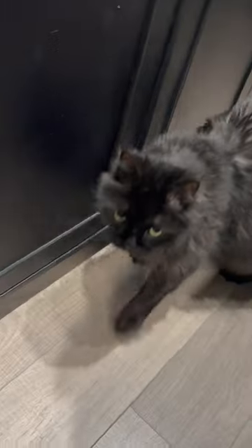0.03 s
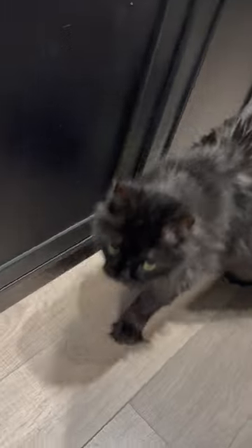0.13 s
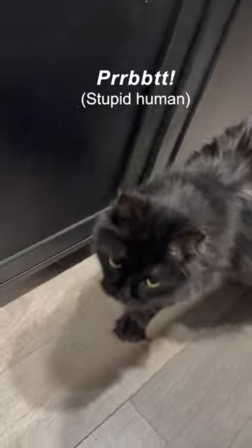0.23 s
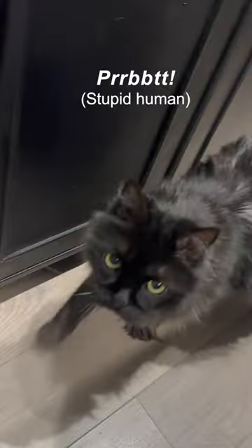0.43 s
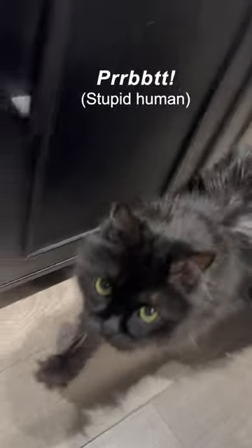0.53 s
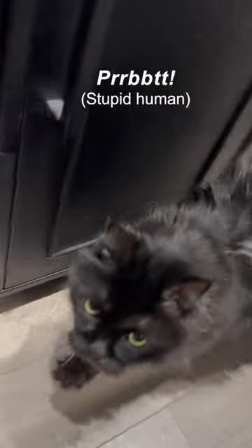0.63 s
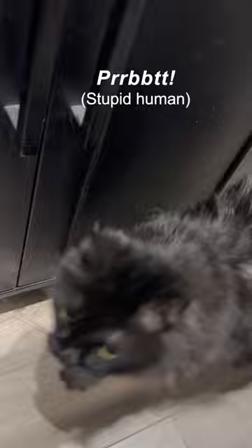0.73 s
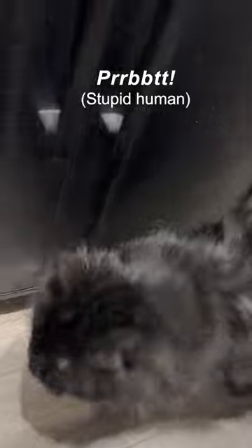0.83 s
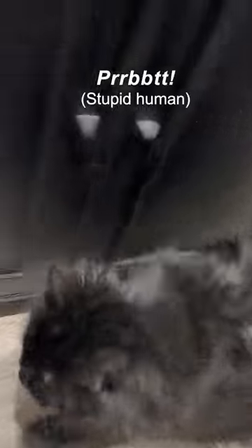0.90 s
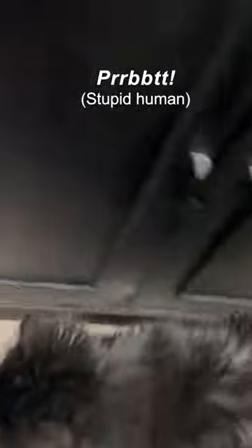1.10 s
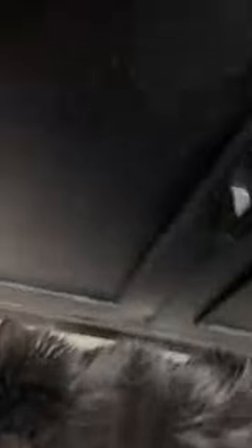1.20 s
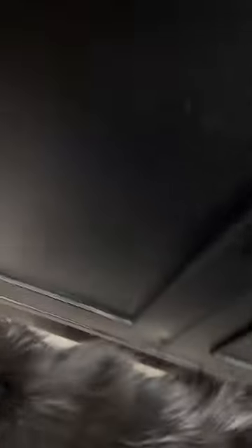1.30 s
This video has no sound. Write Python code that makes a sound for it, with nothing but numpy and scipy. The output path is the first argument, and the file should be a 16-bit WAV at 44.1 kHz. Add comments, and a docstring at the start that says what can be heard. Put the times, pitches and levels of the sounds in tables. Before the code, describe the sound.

One brief, rolling cat trill sounds close by in a quiet room with a low rumble. Soft paw steps on wooden boards come before and after it, and a sharp double click follows the trill.

```python
"""First comes the low rumble of a quiet room, with soft pats as a cat walks up over a wooden floor.
A few dull bumps come through the boards. The cat gives one low, closed-mouth trill: pulses from its
throat ring in throat and nose, flutter about forty times a second and brighten with effort.
Then something small and hard clicks twice close by, and the paws pat again."""
import sys
import numpy as np
from scipy import signal
from scipy.fft import rfft, irfft
from scipy.io import wavfile

SR = 44100
rng = np.random.default_rng(int(sys.argv[2]) if len(sys.argv) > 2 else 0)


def dump_mix(stems):
    """Bounce the given channels to the path in sys.argv[1] as a 16-bit WAV at rate SR."""
    frames = np.atleast_2d(stems).T  # one column per channel
    limited = np.clip(frames, -1, 1)  # hard clip at full scale
    pcm = np.round(limited * 32767).astype(np.int16)
    wavfile.write(sys.argv[1], SR, pcm)


N = 59535

# colour of the room's rumble and hiss (frequency [Hz], relative level [dB])
ROOM_COLOUR = [(25, -8.5), (40, -3.5), (60, -4.5), (78, -0.5), (115, -7.5), (150, -6.5), (210, -14.5),
               (320, -20), (450, -29), (700, -38), (1100, -42.5), (1600, -45), (2100, -40), (2800, -47),
               (4000, -48), (6200, -49), (9500, -55.5), (11000, -72.5)]
# how much of that sound differs between the ears (frequency [Hz], relative level [dB])
ROOM_WIDTH = [(40, -25.5), (120, -22), (300, -6.5), (800, 6), (2500, -9), (9000, 1.5)]
# echo of the walls (band [Hz], time to fade by 60 dB [s], relative level [dB])
ECHO_BANDS = [(154, .3, -7.5), (396, 0.31, 5), (930, 0.25, 3.5), (2380, 0.31, -5), (4000, 0.34, -1.5),
              (7730, 0.18, -1.5), (14900, 0.073, 4.5)]
# dull bumps through the floor (time [s], level [dB], pitch [Hz])
FLOOR_BUMPS = [(0.246, -36, 82.4), (0.291, -32, 77.5), (0.468, -37, 76), (0.814, -36.5, 66.95),
               (1.083, -45, 86.7)]
# paw steps (time [s], level [dB], decay [s], tilt [dB/octave], thud pitch [Hz], thud over scuff [dB])
PAW_STEPS = [(.053, -47.5, 0.0045, -3, 580, 0), (0.094, -62.5, 0.01, -9, 527, 10),
             (.246, -49, 0.013, -4, 650, -1), (0.705, -53.5, 0.013, 4, 388.3, 4),
             (0.777, -67.5, 0.015, 13.5, 498, 15.5), (1.289, -58, 0.0033, -12, 386, 17),
             (1.323, -61.5, 0.013, 0.5, 494, -8)]
# colour of a paw on the boards (frequency [Hz], relative level [dB])
SCUFF_COLOUR = [(100, -17), (350, -12.5), (600, 6.5), (900, -16), (1500, -9.5), (2400, -8), (5000, -24),
                (8000, -36.5), (11000, -54), (14000, -80)]
# contacts of the double click (time [s], level [dB], decay [s], tilt [dB/octave], relative ring [dB])
CONTACTS = [(1.0377, -37.5, 0.0017, 0, -11), (1.0389, -27.5, 0.002, -0.5, -23),
            (1.046, -41, 0.00099, -7, -19), (1.0606, -36.5, 0.0059, 0.5, -29),
            (1.0642, -37.5, 0.0047, -5, -12), (1.0658, -31, 0.0042, 3, -32)]
# colour of the click as heard, with a narrow gap near 12 kHz (frequency [Hz], relative level [dB])
HEARD_CLICK_COLOUR = [(200, -6), (500, -2), (1150, 0), (1700, 0), (2400, 6), (3100, 5), (4600, 2.5),
                      (5700, -1.5), (6600, -1.5), (8500, -3.5), (10300, -12), (12000, -56), (14000, -13),
                      (15500, -11)]
# ringing tones of the hard thing (pitch [Hz], relative level [dB], time to fade by 60 dB [s])
RING_TONES = [(1197, -6.5, 0.075), (1510, -26, 0.026), (2330, 14, 0.028), (2540, -16, 0.012),
              (2840, 11, 0.05), (3197, 10.5, 0.026), (6040, 17.5, 0.011), (7400, -26, 0.034)]
# tune of the trill (time [s], pitch [Hz])
TRILL_PITCH = [(.28, 247), (.325, 255.6), (.35, 269.7), (.375, 302.3), (.41, 300.7), (.445, 316.7),
               (.485, 321.3), (.53, 320.1), (.57, 308), (.597, 278.5), (.625, 310), (.65, 307.1),
               (.675, 289.8), (.702, 336.6)]
# the hum, the voice's lowest tone (time [s], level [dB])
HUM_LEVEL = [(.27, -72.5), (.295, -48), (.315, -41.5), (.355, -33.5), (.41, -37.5), (.49, -36.5),
             (.55, -35), (.63, -35), (.675, -39), (.7, -47), (.72, -63.5)]
# the overtones above the hum, which grow with effort (time [s], level [dB])
OVERTONE_LEVEL = [(.29, -70), (.34, -53), (.37, -46.5), (.425, -37.5), (.48, -34), (.55, -37), (.58, -36.5),
                  (.635, -41), (.665, -47), (.698, -51), (.72, -76)]
# how throat and nose colour the overtones (frequency [Hz], relative level [dB])
THROAT_COLOUR = [(450, -3), (620, 4), (780, -16.5), (940, -0.5), (1230, -6), (1500, -12), (1740, -29),
                 (1950, -20.5), (2600, -32.5), (3400, -25.5), (3750, -19.5), (4000, -19.5), (4400, -39),
                 (8500, -35)]
# the voice bouncing off floor and cabinet (delay [s], relative level [dB])
NEAR_ECHOES = [(.0064, -25.5), (0.0126, -18)]

# the flutter has this rate at FLUTTER_CREST_S and slows steadily
FLUTTER_HZ, FLUTTER_SLOWS_HZ_PER_S, FLUTTER_CREST_S = 41.34, 22, .501
FLAP_PITCH_DROP, FLAP_DIP_DB, DIP_LEAD_S = .21, -1.5, .0013
JITTER, SHIMMER_DB = .013, 1.8  # random wobble of pitch and of level
PULSE_SPREAD, PULSE_TOP_HZ = .318, 2330  # the spread smears each pulse over its cycle
RASP_DB, RATTLE_DB = -9, -45
WHISTLE_S, WHISTLE_HZ, WHISTLE_WIDTH_HZ, WHISTLE_DB = .414, 4020, 100, -58.5
KNOCK_S, KNOCK_HZ, KNOCK_DB = 1.064, 465, -43


def undb(db):
    """Turn decibels into a number to multiply by."""
    return 10 ** (np.asarray(db) / 20)


def unit(x):
    """Scale a sound to an average (rms) strength of 1."""
    return x / np.sqrt(np.mean(x ** 2))


def curve(table, t):
    """Join (time, value) rows with straight lines."""
    return np.interp(t, *np.array(table).T)


def gain_at(table, hz):
    """Read the gain at any frequency from a colour table."""
    f, db = np.array(table).T
    return undb(np.interp(np.log(np.maximum(hz, 1)), np.log(f), db))


def shape(x, gain):
    """Turn each frequency f up or down by gain(f)."""
    hz = np.arange(N + 1) * SR / (2 * N) + 1e-3
    return irfft(rfft(x, 2 * N) * gain(hz), 2 * N)[..., :N]


def noise(table, tilt_db=0):
    """Coloured noise; a tilt above zero makes it brighter."""
    white = rng.standard_normal(N)
    return unit(shape(white, lambda f: gain_at(table, f) * undb(tilt_db * np.log2(f.clip(100) / 1000))))


def band(x, centre_hz, width_hz):
    """Keep the frequencies near a centre, at strength 1."""
    return unit(shape(x, lambda f: np.exp(-((f - centre_hz) / width_hz) ** 2)))


def wobble(rate_hz):
    """A smooth random wobble, mostly slower than the rate."""
    return band(rng.standard_normal(N), 0, rate_hz)


def burst(t, attack_s, decay_s):
    """Rise quickly from t = 0, then die away."""
    return np.clip(t / attack_s, 0, 1) * np.exp(-np.maximum(t - attack_s, 0) / decay_s)


def resonate(x, table):
    """Pass a sound through a hollow space that rings on after each pulse."""
    # the cepstrum gives a filter of this colour that rings only after a pulse, never before
    cepstrum = irfft(np.log(gain_at(table, np.arange(N + 1) * SR / (2 * N))))
    return shape(x, lambda f: np.exp(rfft(2 * cepstrum[:N], 2 * N) - cepstrum[0]))


def in_room(x, t, echo_db, gap_s=.003, left_lag_s=.000032):
    """Sound reaches the left ear a little late, and the walls add a soft echo."""
    hz, fade_s, db = np.array(ECHO_BANDS).T
    white, tail = rng.standard_normal((2, N)), 0
    for k, only_this_band in enumerate(np.eye(len(hz))):
        hiss = shape(white, lambda f: np.interp(np.log(f), np.log(hz), only_this_band))
        tail = tail + hiss * undb(db[k]) * burst(t - gap_s, gap_s, fade_s[k] / np.log(1000))
    echo = signal.fftconvolve(x[None], unit(tail) / np.sqrt(N), axes=1)[:, :N]
    left = shape(x, lambda f: np.exp(-2j * np.pi * f * left_lag_s))
    return np.array([left, x]) + undb(echo_db) * echo


def room_tone(level_db=-47, waver_db=.5):
    """A wavering rumble, alike in both ears, under a faint wide hiss."""
    middle = noise(ROOM_COLOUR)
    rumble = shape(middle, lambda f: 1 / (1 + (f / 250) ** 4))
    middle = middle + rumble * (undb(waver_db * wobble(24)) - 1)
    side = shape(noise(ROOM_COLOUR), lambda f: gain_at(ROOM_WIDTH, f))
    ears = np.array([middle + side, middle - side])
    return undb(level_db) * shape(ears, lambda f: 1 / (1 + (f / 11000) ** 20))


def bumps(t):
    """Soft, deep bumps come through the floor, the same in both ears."""
    return sum(undb(db) * burst(t - start, .024, .01) * np.sin(2 * np.pi * hz * (t - start))
               for start, db, hz in FLOOR_BUMPS)


def paws(t):
    """Each step is a scuff and a short thud of the board under it."""
    scuffs, thuds = 0, 0
    for start, db, decay_s, tilt_db, thud_hz, thud_db in PAW_STEPS:
        press = undb(db) * burst(t - start, .0024, decay_s)
        scuffs = scuffs + press * noise(SCUFF_COLOUR, tilt_db)
        thuds = thuds + press * undb(thud_db) * np.sin(2 * np.pi * thud_hz * (t - start))
    return in_room(scuffs, t, echo_db=-4) + thuds


def double_click(t, width=.089):
    """A sharp snap, then a rougher catch with a hollow knock; each contact cracks and rings briefly."""
    knock = undb(KNOCK_DB) * burst(t - KNOCK_S, .006, .008) * np.sin(2 * np.pi * KNOCK_HZ * (t - KNOCK_S))
    middle, side = 0, 0
    for start, db, decay_s, tilt_db, ring_db in CONTACTS:
        age = np.maximum(t - start, 0)
        crack = burst(age, .00056, decay_s)
        ring = sum(undb(tone_db) * np.sin(2 * np.pi * hz * age) * undb(-60 * age / fade_s)
                   for hz, tone_db, fade_s in RING_TONES)
        middle = middle + undb(db) * (crack * noise(HEARD_CLICK_COLOUR, tilt_db) + undb(ring_db) * ring)
        side = side + undb(db) * crack * noise(HEARD_CLICK_COLOUR, tilt_db)
    return in_room(middle, t, echo_db=-6) + width * np.array([side, -side]) + knock


def flap(t):
    """The throat flaps between open (0) and briefly shut (1)."""
    since_crest = t - FLUTTER_CREST_S
    cycles = FLUTTER_HZ * since_crest - FLUTTER_SLOWS_HZ_PER_S * since_crest ** 2 / 2
    return np.abs(np.sin(np.pi * cycles)) ** 5.2


def throat_buzz(phase):
    """The throat pulses once a cycle, and air rasps in time with it."""
    pulses = unit(sum(np.cos(k * phase - PULSE_SPREAD * k ** 2) for k in range(2, 32)))
    pulses = shape(pulses, lambda f: 1 / (1 + (f / PULSE_TOP_HZ) ** 6))
    air = rng.standard_normal(N) * (1 + .33 * np.cos(phase)) * undb(2 * wobble(110))
    air = unit(shape(air, lambda f: 1 / (1 + (750 / f) ** 4) / (1 + (f / 10000) ** 12)))
    return pulses + undb(RASP_DB) * air


def whistle(t):
    """A faint, high whistle starts partway through the trill and fades."""
    hiss = band(rng.standard_normal(N), WHISTLE_HZ, WHISTLE_WIDTH_HZ)
    return hiss * undb(WHISTLE_DB) * burst(t - WHISTLE_S, .0044, .075)


def trill(t):
    """The cat hums; each flap in its throat drags the pitch down and softens the voice for a moment."""
    flap_time = t + .001 * wobble(28.8)  # the flaps come a little unevenly
    overtone_gain = undb(curve(OVERTONE_LEVEL, t))
    effort = overtone_gain / overtone_gain.max()
    pitch_drop = FLAP_PITCH_DROP * effort ** .15 * flap(flap_time)
    hz = curve(TRILL_PITCH, t) * (1 - pitch_drop + JITTER * wobble(234))
    phase = 2 * np.pi * np.cumsum(hz) / SR
    shut = flap(flap_time + DIP_LEAD_S)  # the level dips just before the pitch
    flutter = undb(FLAP_DIP_DB * shut + SHIMMER_DB * wobble(170))
    hum = unit(np.sin(phase) * flutter) * undb(curve(HUM_LEVEL, t))
    overtones = unit(resonate(throat_buzz(phase) * flutter, THROAT_COLOUR)) * overtone_gain
    taps = shut ** 2 * undb(1.7 * wobble(66))
    rattle = band(taps, centre_hz=140, width_hz=60) * undb(RATTLE_DB) * effort
    start, end = HUM_LEVEL[0][0], HUM_LEVEL[-1][0]
    fade = np.clip(np.minimum(t - start, end - t) / .01, 0, 1)
    voice = (hum + overtones + rattle + whistle(t)) * fade
    bounces = sum(undb(db) * np.interp(t - delay, t, voice) for delay, db in NEAR_ECHOES)
    return in_room(voice + bounces, t, echo_db=-17.5)


def scene():
    """Trill, paws, bumps and clicks in the quiet room."""
    t = np.arange(N) / SR
    return trill(t) + paws(t) + bumps(t) + double_click(t) + room_tone()


def record(dry):
    """Take away the deepest bass and the highest treble."""
    thin = signal.sosfilt(signal.butter(6, 32, "high", fs=SR, output="sos"), dry)
    return signal.sosfilt(signal.ellip(8, .2, 80, 15900, fs=SR, output="sos"), thin)


dry = scene()
out = record(dry)
dump_mix(out)
```